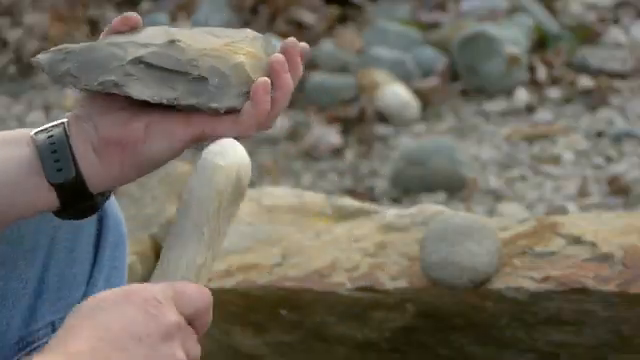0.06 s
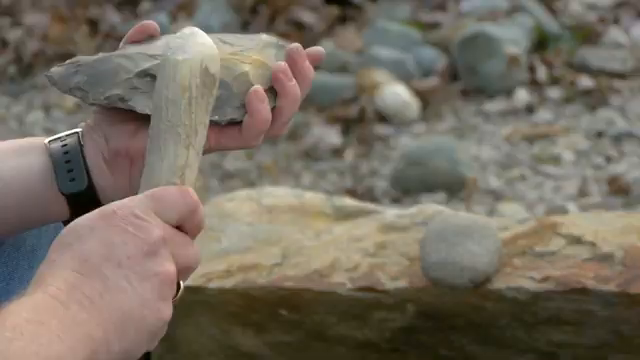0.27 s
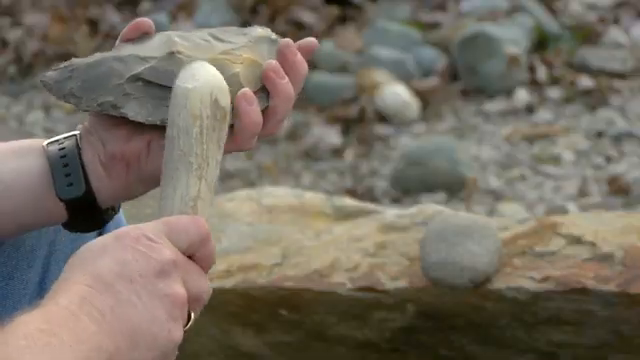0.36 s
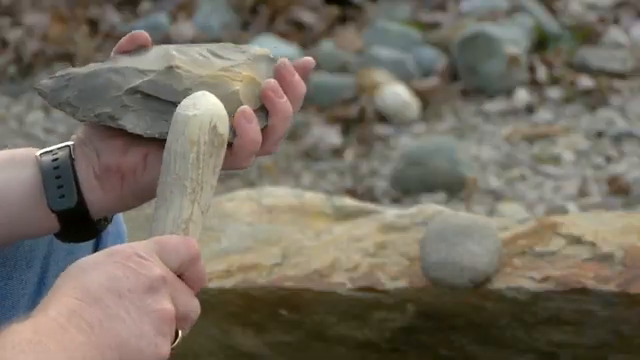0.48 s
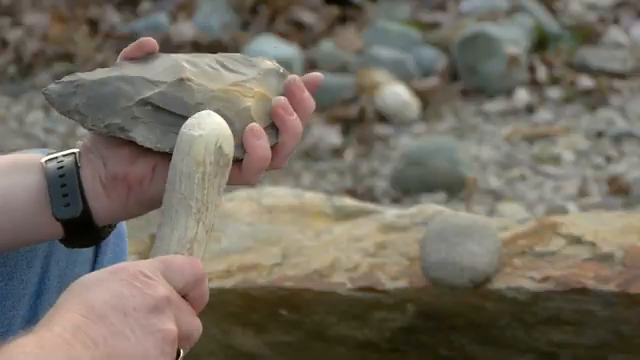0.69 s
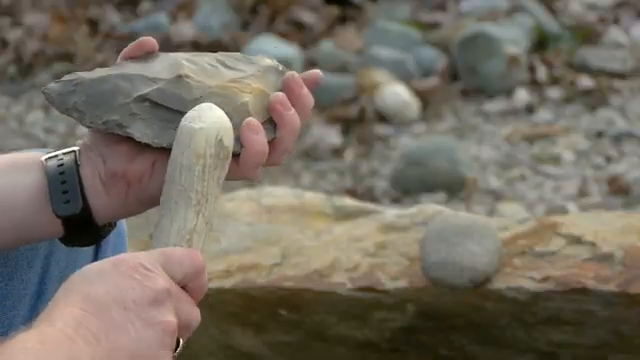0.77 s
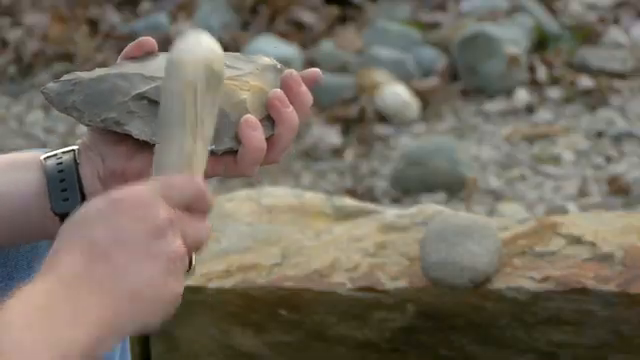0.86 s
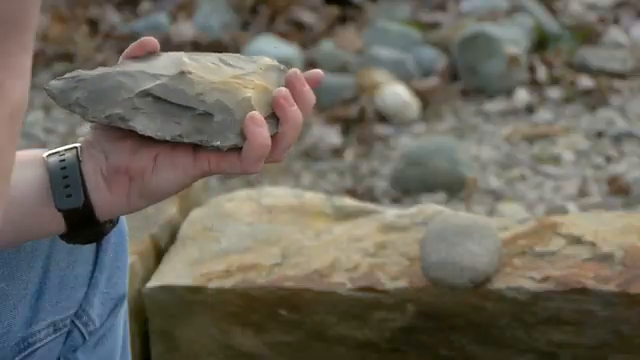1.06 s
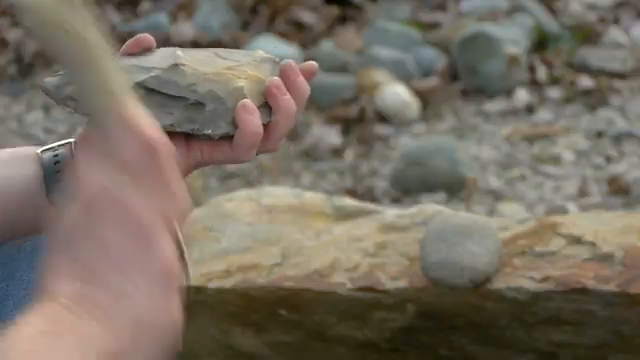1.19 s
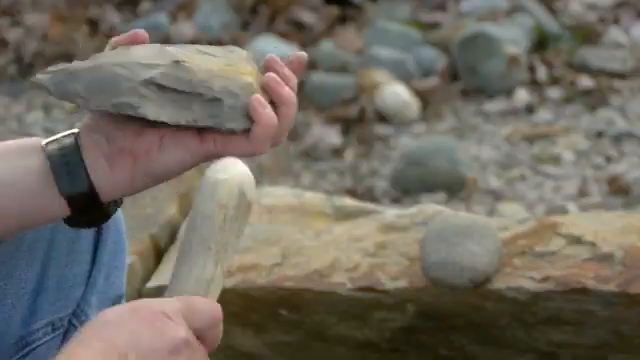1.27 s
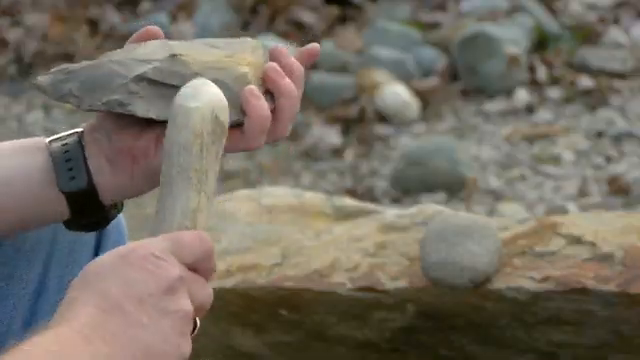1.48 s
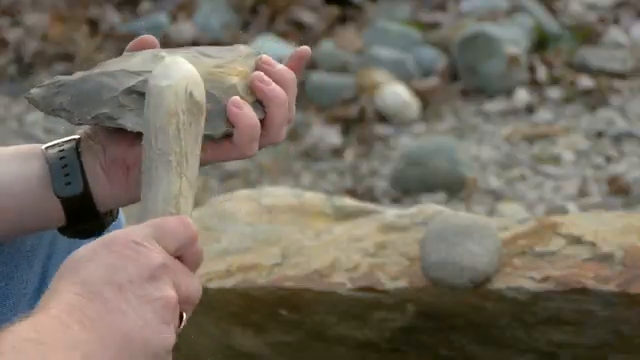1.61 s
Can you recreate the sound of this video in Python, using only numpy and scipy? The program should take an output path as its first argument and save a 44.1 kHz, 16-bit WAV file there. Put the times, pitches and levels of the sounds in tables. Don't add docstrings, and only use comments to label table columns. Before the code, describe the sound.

An antler hammer cracks twice against a hand-held stone, sharp ringing knocks with short rocky echoes outdoors

```python
import sys
import numpy as np
from scipy import signal
from scipy.fft import rfft, irfft
from scipy.io import wavfile
from scipy.ndimage import uniform_filter1d

SR = 44100
rng = np.random.default_rng(int(sys.argv[2]) if len(sys.argv) > 2 else 0)


def persist_wave(psi):
    counts = np.round(np.clip(psi, -1, 1) * 32767).astype(np.int16)
    wavfile.write(sys.argv[1], SR, np.atleast_2d(counts).T)


def convert_level_to_amplitude(level_db):
    exponent = np.asarray(level_db, float) / 20
    return 10 ** exponent


N = 72765
T = np.arange(N) / SR


def decay(t, t60):
    return np.exp(-np.log(1000) * t / t60)


def ring(hz, t60):
    t = T[:SR // 3]
    return np.sin(2 * np.pi * hz * t) * decay(t, t60)


def add(out, x, s):
    i = int(round(s * SR))
    n = min(len(x), N - i)
    out[i:i + n] += x[:n]


def low(x, hz, order=2):
    return signal.sosfilt(signal.butter(order, min(hz, .45 * SR), fs=SR, output="sos"), x)


def band(x, hz, wide):
    edges = [hz / 2 ** wide, min(hz * 2 ** wide, .45 * SR)]
    return signal.sosfilt(signal.butter(1, edges, "band", fs=SR, output="sos"), x)


def narrow_band(x, hz, wide):
    return band(band(x, hz, wide), hz, wide)


def stone(column, high_db=0., low_db=0., thud_db=0., bright_db=0., grip=1., all_grip=0.98):
    # f/Hz, t60/s, level/dB in first blow, level/dB in second blow, level/dB in light touches
    modes = [(480, .03, -18, -24.5, -20.5), (850, .008, -20.5, -10.5, -13.5),
             (1775.4, 0.034, -4, 0.5, -0.5), (1390, 0.0046, -25, -19, -3.5), (2221, .036, 0, -1, -2.5),
             (2640, 0.0074, -29.5, -16.5, -6), (2950, 0.056, -28, -22, -21),
             (3600, 0.018, -25.5, -22.5, -52), (4390, .025, -26, -32, -35.5),
             (4850, .015, -18.5, -35.5, -35.5), (6720, .08, -30.5, -12.5, -47),
             (2030, 0.054, -16, -18, -19), (9122, .035, -19, -21.5, -35), (10870, 0.0074, -34, -36.5, -53)]
    out = 0
    for k, mode in enumerate(modes):
        hz, t60 = mode[:2]
        db = mode[column] + (high_db if hz > 1900 else low_db)
        db += thud_db * (hz < 1500) + bright_db * (hz > 3000)
        held = all_grip * (grip if hz < 3000 else 1)
        out = out + (-1) ** k * convert_level_to_amplitude(db) * ring(hz, t60 * held)
    return out


def burst(hz, t60, wide, per_s=SR):
    n = SR // 4
    grains = rng.standard_normal(n) * (rng.random(n) < per_s / SR) * np.sqrt(SR / per_s)
    return narrow_band(grains, hz, wide) * decay(T[:n], t60)


def thump(db, first, growth, t60):
    t = T[:SR // 3]
    swings = np.log(1 + (growth - 1) * t / first) / np.log(growth)
    return -convert_level_to_amplitude(db) * np.sin(np.pi * swings) * decay(t, t60)


def blows():
    # t/s, level/dB, crack level/dB, share of low ring time left by the grip, level towards the walls/dB
    strikes = [
        (.0600, -2.5, -22, 0.97, 0),
        (1.3502, -2.5, -26, .85, -1),
        (.5526, -31, -79, 0.43, -7),
    ]
    # delay/s, level over 1.9 kHz/dB, level under it/dB
    contacts = [
        [(0, -12.5, -13), (.0016, 3.5, -13.5), (.0043, -12, 1)],
        [(-.0012, -19.5, -22), (.0001, -0.5, -1.5), (.0033, -4.5, -2.5)],
        [(0, -10, 3.5), (.0008, -9.5, -16.5), (.0022, 0.5, -6.5)],
    ]
    thuds = [
        [2.5, 6.5, -20.5],
        [-7, 2.5, -26],
        [4.5, -17, -12],
    ]
    # level/dB, first swing/s, growth per swing, t60/s
    thumps = [
        (-15.5, .003, 2.01, 0.1),
        (-11, 0.002, 3.5, 0.037),
        (-51.5, 0.0015, 3.9, 0.18),
    ]
    sideways_ring = 0.39
    direct, sideways, body = np.zeros(N), np.zeros(N), np.zeros(N)
    for k, (s, db, crack_db, grip, send_db) in enumerate(strikes):
        wall_db = db + send_db
        for (late, high_db, low_db), thud_db in zip(contacts[k], thuds[k]):
            heard = stone(2 + k, high_db, low_db, thud_db=thud_db, grip=grip)
            sent = stone(2 + k, high_db, low_db, grip=grip, all_grip=sideways_ring)
            add(direct, convert_level_to_amplitude(db) * heard, s + late)
            add(sideways, convert_level_to_amplitude(wall_db) * sent, s + late)
        crack = convert_level_to_amplitude(crack_db) * burst(5700, t60=0.033, wide=0.88)
        grit = convert_level_to_amplitude(crack_db - 1) * burst(3340, t60=.11, wide=.6, per_s=1700)
        add(direct, crack + grit, s)
        snap = convert_level_to_amplitude(wall_db + 0.5) * ring(3700, t60=.0022)[:len(crack)]
        add(sideways, crack + snap, s)
        add(body, thump(*thumps[k]), s)
    return direct, sideways, body


def rubs():
    # t/s, length/s, level/dB
    strokes = [(0.616, .02, -89), (0.63, 0.019, -74), (0.664, .008, -79), (1.118, 0.016, -82.5)]
    clicks_per_s = 1600
    clicks = (rng.random(N) < clicks_per_s / SR) * rng.standard_normal(N)
    pressure = sum(convert_level_to_amplitude(db) * np.exp(-.5 * ((T - s) / (length / 2)) ** 2) for s, length, db in strokes)
    touched = stone(column=4, bright_db=31, grip=0.78, all_grip=0.8)
    return signal.fftconvolve(clicks * pressure, touched)[:N]


def ticks():
    times = [.234, .398, .674, .948, 1.1445, 1.178, 1.268, 1.299, 1.385, 1.412, 1.442]
    # pop level/dB, click level/dB
    levels = [(-59, -80), (-56, -78), (-55, -76), (-54.5, -73), (-44, -55), (-56, -65), (-54.5, -64),
              (-51.5, -54.5), (-45, -67), (-43.5, -52), (-52, -75)]
    out = np.zeros(N)
    for s, (pop_db, click_db) in zip(times, levels):
        add(out, -convert_level_to_amplitude(pop_db) * ring(400, t60=0.0091), s)
        click = rng.standard_normal(400) * np.exp(-T[:400] / 0.0015)
        add(out, convert_level_to_amplitude(click_db) * band(click, 3500, 0.43), s)
    return out


def noise_tail(t60):
    return rng.standard_normal(N) * decay(T, t60) * np.sqrt(2 * np.log(1000) / t60 / SR)


def space(x):
    # delay/s, level/dB, centre f/Hz
    echoes = [(.0185, -19.5, 3500), (.0275, -19.5, 2800), (.135, -51.5, 2200), (.22, -62, 3800)]
    out = np.zeros(N)
    for late, db, hz in echoes:
        add(out, convert_level_to_amplitude(db) * band(x, hz, .5), late)
    near = convert_level_to_amplitude(-20.5) * low(noise_tail(t60=.12), 5000, order=1)
    swell = np.clip(T / 0.14, 0, 1)
    mid = convert_level_to_amplitude(-31) * narrow_band(noise_tail(t60=0.601), 3932, 0.52) * swell
    far = convert_level_to_amplitude(-39.5) * narrow_band(noise_tail(t60=3.1), 2170, .24) * swell ** 2 / (1 + (T / 0.63) ** 9)
    patches = convert_level_to_amplitude(2.5 * np.interp(T / .03, np.arange(200), rng.standard_normal(200)))
    return out + signal.fftconvolve(x, near + (mid + far) * patches)[:N]


def air():
    # f/Hz, level per Hz/dB
    spectrum = np.array([(15, -29), (25, 0), (185, -9), (497, -20), (645, -22), (1000, -28), (12500, -40.5),
                         (16200, -77.5), (22000, -120)])
    level_db, flicker_db = -69, 2.5
    f = np.fft.rfftfreq(N, 1 / SR) + 1e-3
    colour = convert_level_to_amplitude(np.interp(np.log(f), np.log(spectrum[:, 0]), spectrum[:, 1]))
    out = 0
    for hz in 20 * 2. ** np.arange(10):
        share = np.cos(np.pi / 2 * np.clip(np.log2(f / hz), -1, 1))
        walk = uniform_filter1d(np.repeat(rng.standard_normal(N // 2000 + 1), 2000), 2000)[:N]
        noise = irfft(rfft(rng.standard_normal(N)) * colour * share, N)
        out = out + convert_level_to_amplitude(flicker_db * walk * (hz < 1000)) * noise
    return out * convert_level_to_amplitude(level_db) / np.std(out)


def scene():
    direct, sideways, body = blows()
    return (direct + rubs() + space(sideways) + body + ticks() + air())[None]


def low_pass(x):
    return signal.sosfilt(signal.butter(12, 12880, fs=SR, output="sos"), x)


def record(dry):
    clipped = np.clip(dry, -.62, .6)
    no_bass = signal.sosfilt(signal.butter(1, 9, "high", fs=SR, output="sos"), clipped)
    mix = low(no_bass, 11700, order=16)
    return low_pass(mix)


dry = scene()
out = record(dry)
persist_wave(out)
```